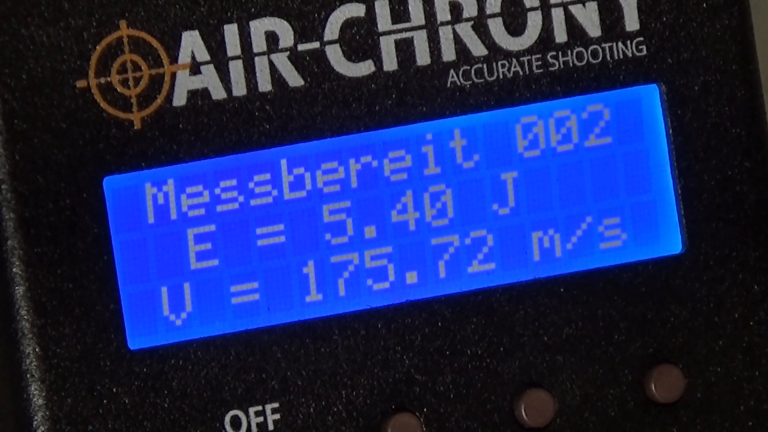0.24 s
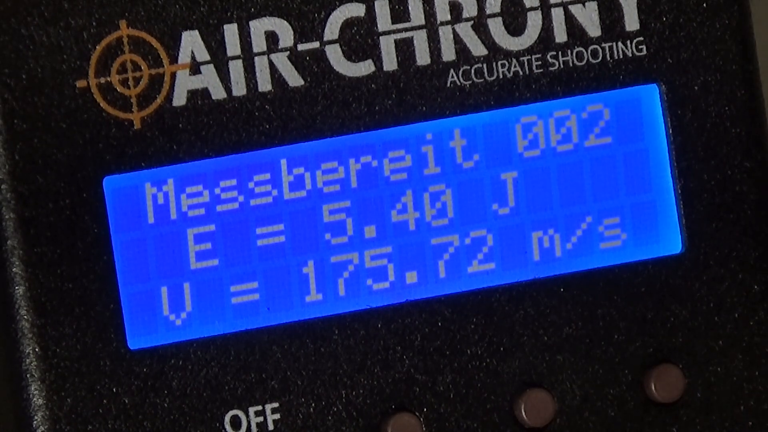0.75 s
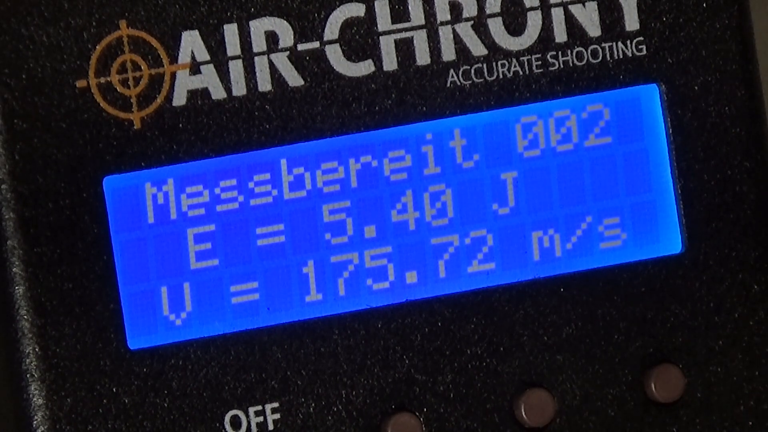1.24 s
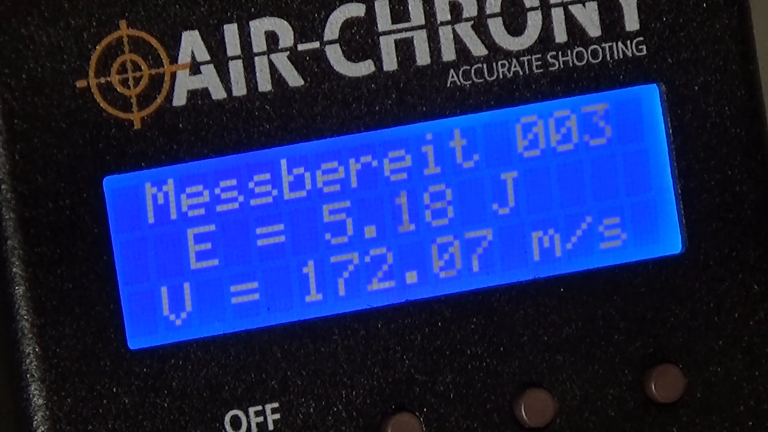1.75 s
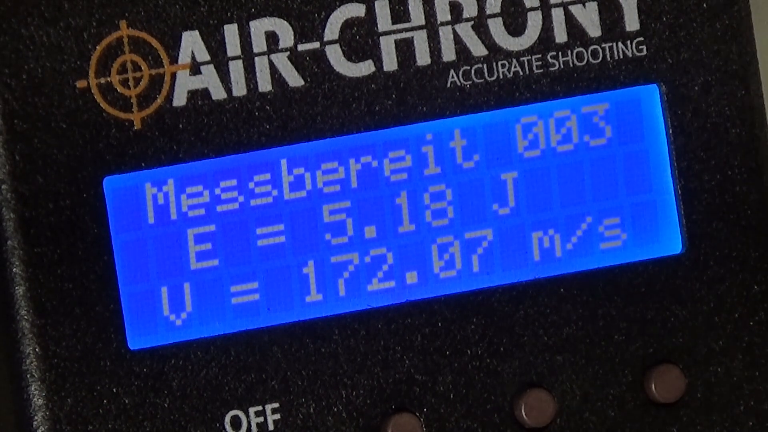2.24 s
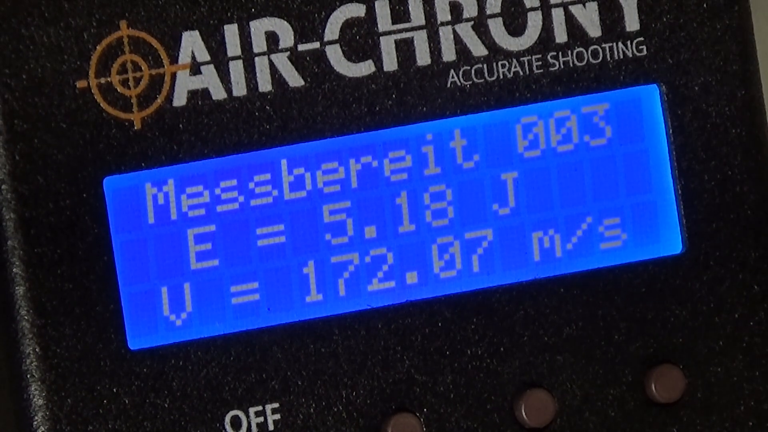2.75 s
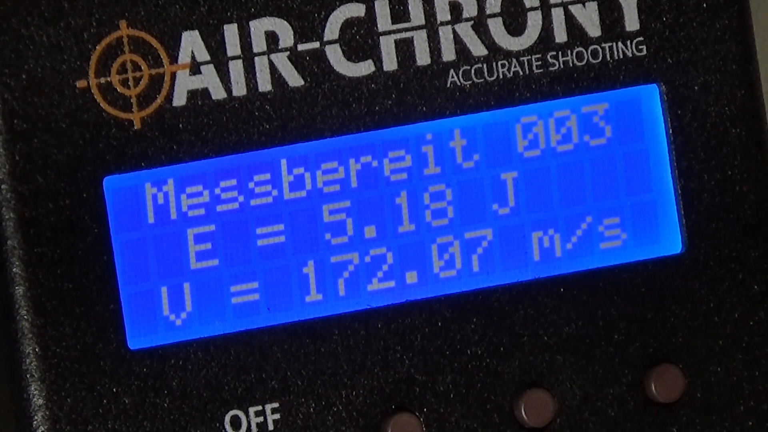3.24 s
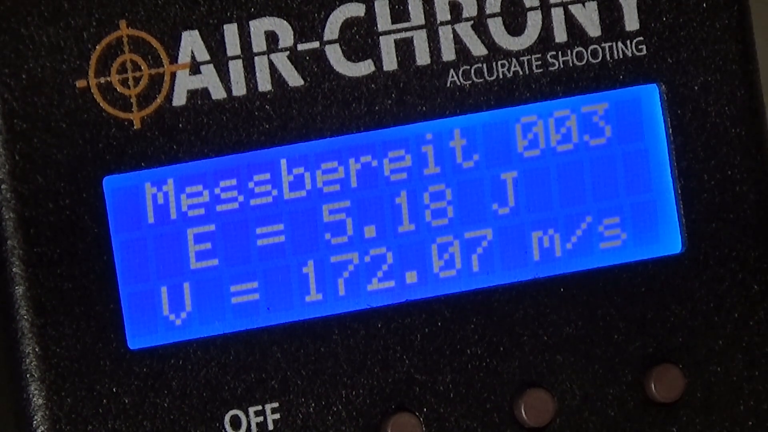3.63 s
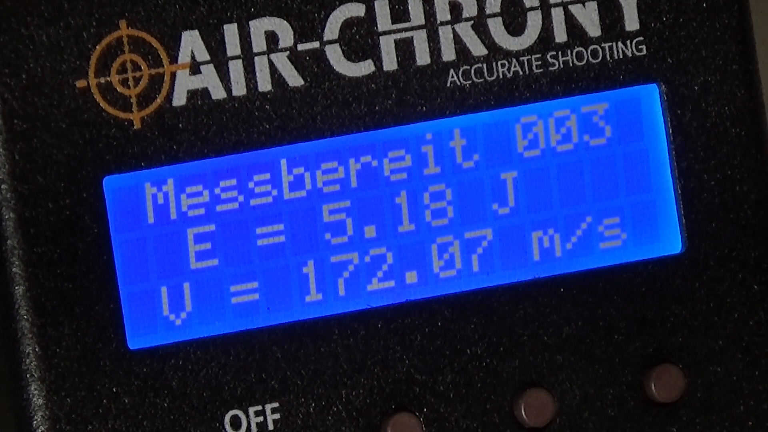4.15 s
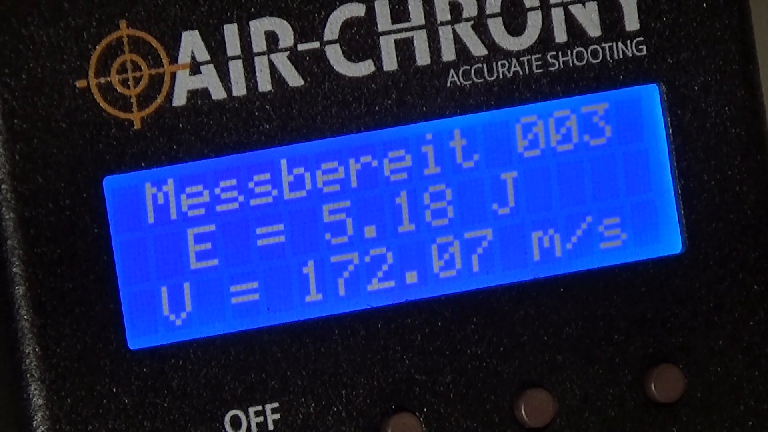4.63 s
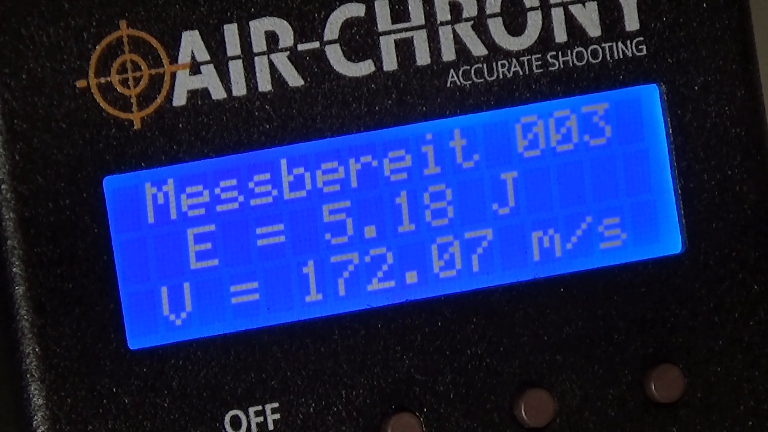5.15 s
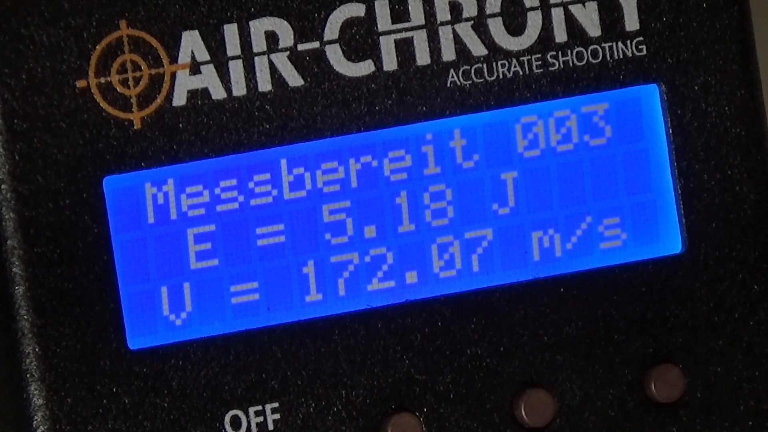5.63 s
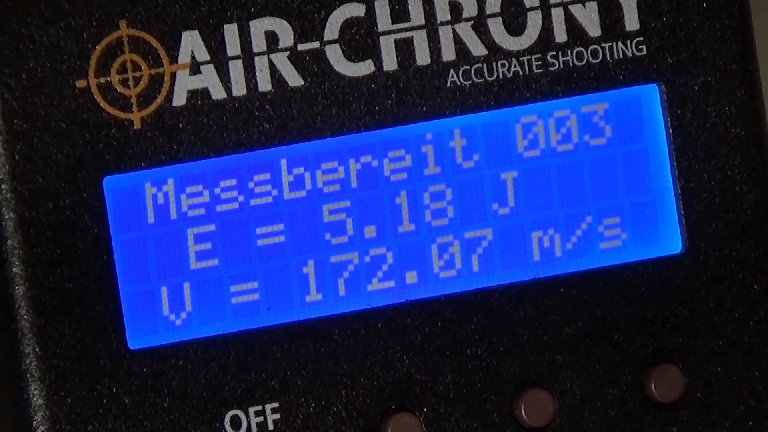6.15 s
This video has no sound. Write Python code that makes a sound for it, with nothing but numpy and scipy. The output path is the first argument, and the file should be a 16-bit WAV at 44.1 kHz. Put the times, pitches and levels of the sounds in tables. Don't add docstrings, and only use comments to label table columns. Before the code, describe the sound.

An empty shell rattles faintly, an air rifle fires one sharp crack, its steel lever clacks open and shut, a shell drops on hollow wood, cloth rustles.

```python
import sys
import numpy as np
from scipy import signal
from scipy.fft import rfft, irfft
from scipy.io import wavfile
from scipy.ndimage import uniform_filter1d

SR = 44100
rng = np.random.default_rng(int(sys.argv[2]) if len(sys.argv) > 2 else 0)


def invert_db(x):
    u = np.asarray(x, float) / 20
    return 10 ** u


def generate_wav(signal):
    frames = np.transpose(np.atleast_2d(signal))
    scaled = np.clip(frames, -1, 1) * 32767
    pcm = np.round(scaled).astype(np.int16)
    wavfile.write(sys.argv[1], SR, pcm)


N = 282240
SPAN = 2 ** 13

# time_s, level_db
HISS_LEVEL = [(1.4, -56.5), (3.5, -56), (4.82, -52.5), (5.17, -49.5), (6.4, -50)]
# frequency_hz, density_db
HISS_SPECTRUM = [(15, -64), (25, -24), (53, -15.5), (174, -4.5), (290, -1.5), (446, 1.5), (616, 1.5),
                 (785, 1.5), (2240, -3), (15600, -13.5)]
# frequency_hz, likeness (0 to 1)
HISS_LIKENESS = [(60, 0.49), (180, 0.92), (550, 0.11), (1650, 0.031), (4970, 0.77), (15000, 1)]

# frequency_hz, likeness (0 to 1)
ROOM_LIKENESS = [(60, 1), (150, 1.0), (380, 0.99), (950, 0.86), (2380, 0.7), (5980, 0.7), (15000, 1)]
# frequency_hz, t60_s
ROOM_DECAY = [(100, 0.73), (300, 0.58), (1000, 0.45), (3000, 0.51), (8000, 0.35), (16000, 0.17)]
# frequency_hz, level_db (against the blast), t60_s
ROOM_MODE = (214, -26, 1)
# start_s, level_db
EARLIER_BOOM = (0.3, -52)

# frequency_hz, density_db
CLOTH_SPECTRUM = [(2350, -22), (4000, -8.5), (6560, -10), (7480, -3.5), (10300, 0), (13700, 0), (15600, 1)]
# time_s, level_db
ARM_DRAG = [(4.3, -70), (4.75, -64), (4.86, -51), (5.05, -49), (5.45, -52), (5.9, -49.5), (6.4, -50.5)]
# peak_s, level_db, fine_db (finest fibres against the tug), rise_s, fall_s
SLEEVE_TUGS = [(1.79, -51, 0, 0.045, 0.06), (1.94, -55, 2, 0.042, 0.03), (4.5, -55, -4, 0.076, 0.088),
               (4.635, -54, 2, 0.015, 0.03), (4.78, -52, 1, 0.015, 0.05), (4.92, -62, -2, 0.08, 0.15),
               (5.17, -53, 3, 0.08, 0.36), (5.508, -48, -7, 0.05, 0.091), (5.81, -48, -6, 0.2, 0.021),
               (5.975, -47.5, 11, 0.015, 0.026), (6.168, -46, -6, 0.11, 0.08)]

# frequency_hz, density_db
BOARD_SPECTRUM = [(88, -69), (150, -35.5), (456, -13.5), (769, -1.5), (895, -10), (1590, -18.5),
                  (2220, -50.5), (4000, -77), (5200, -71), (8800, -120)]
BOARD_HZ = 753
# start_s, peak_db, pitch_hz
FLAT_BOUNCES = [(0.02, -16, 977), (0.039, -12.5, 968), (0.069, -18.5, 803), (0.099, -20.5, 1020),
                (0.309, -40, 780), (0.498, -38.5, 625), (0.558, -39, 670), (0.852, -34, 730),
                (2.888, -2.5, 726), (2.905, -12.5, 680), (2.956, -14.5, 750), (2.992, -5.5, 772),
                (3.072, -3.5, 803), (3.131, -8, 808)]
# start_s, peak_db, pitch_hz
RIM_BOUNCES = [(0.004, -15, 1245), (0.024, -15.5, 1335), (0.127, -21, 1002), (2.987, -15, 986),
               (3.018, -17, 990), (3.066, -14, 1090), (3.099, -19.5, 1035), (3.126, -24, 1123)]
# start_s, stop_s, level_db
SHELL_ROLL = (0.23, 0.73, -53.5)
# frequency_hz, density_db
EDGE_SPECTRUM = [(1000, -51), (2000, -12), (4000, 1), (7000, -7.5), (11000, -7.5), (16000, -14.5)]
# frequency_hz, density_db
SLAM_SPECTRUM = [(35, -78), (60, -44), (146, -25.5), (1080, 9), (1620, 5.5), (1840, 1), (2870, -5.5),
                 (3650, -34), (5000, -21), (6500, -62), (11000, -120)]
# start_s, peak_db, pitch_hz, bright_db (against the peak), t60_s
LEVER_SLAMS = [
    (2.699, 2, 1175, -36, 0.11),
    (2.711, -4.5, 1560, -10, 0.13),
    (2.724, -5.5, 1110, -18, 0.11),
    (2.736, -8.5, 835, -11.5, 0.16),
    (2.748, -4.5, 1290, -13.5, 0.054),
]
# frequency_hz, density_db
TAP_SPECTRUM = [(150, -43), (350, 3), (700, -4), (1200, -1), (2000, -7), (4000, -19)]
# start_s, peak_db, pitch_hz, bright_db (against the peak), t60_s
HAND_TAPS = [
    (5.15, -29, 2010, -24, 0.043),
    (5.529, -45, 820, -13, 0.062),
    (5.732, -36, 610, -21.5, 0.096),
    (5.986, -31, 4010, -14, 0.043),
]

# frequency_hz, density_db
STEEL_SPECTRUM = [(1060, -21.5), (1800, -8), (2320, -18.5), (2990, -6), (4170, -7), (6380, -12),
                  (9490, -6.5), (13000, -4.5), (15600, -16)]
# frequency_hz, density_db
STOCK_SPECTRUM = [(120, -59), (200, -19.5), (607, -1), (681, -6), (749, -5), (2500, -4.5), (3250, -49),
                  (5500, -120)]
# start_s, peak_db, high_ring_hz, t60_s
LATCH = (3330, -12.5, -6)
LATCH_HITS = [(1.954, -21.5, 10350, 0.032)]
CARRIER = (4270, -8.5, -10)
CARRIER_HITS = [
    (2.0313, -6.5, 14600, 0.11),
    (2.0448, -6, 14100, 0.024),
    (2.0891, -6, 10900, 0.048),
]
CAM = (4050, -4, -8)
CAM_HITS = [(2.1401, -5, 9570, 0.06)]
BOLT = (2380, -4.5, -32)
BOLT_HITS = [
    (2.1971, -11, 11760, 0.048),
    (2.203, 2, 12100, 0.035),
    (2.2091, 2.5, 13200, 0.074),
    (2.219, -3, 9600, 0.11),
    (2.2487, -6, 9700, 0.12),
]
RETURN = (2060, -0.23, -12.5)
RETURN_HITS = [(2.5845, -5, 10440, 0.063)]
HOOK = (2600, -18, -10)
HOOK_HITS = [(2.7203, -7.5, 10200, 0.044)]
LOCK = (2000, -15, -12)
LOCK_HITS = [
    (2.7583, -5, 10970, 0.045),
    (2.7749, 5.5, 11180, 0.035),
]
LINK = (1520, -4, -8.5)
LINK_SLIDES = [(2.0083, -11, 11600, 0.052), (2.1129, -7, 11460, 0.036), (2.1514, -21, 9500, 0.037),
               (2.6518, -1, 9580, 0.024)]
TAKE_UP = (1980, -0.5, -15)
TAKE_UP_SLIDES = [(2.5325, -32.5, 13200, 0.048), (2.5502, -23, 11700, 0.13), (2.5616, -9.5, 13500, 0.065)]
SPRING = (5350, 3, -18.5)
SPRING_SLIDES = [(2.602, 0, 9600, 0.025)]
GUIDE = (5900, -12, -33.5)
GUIDE_SLIDES = [(2.6148, -0.5, 9480, 0.076)]

# start_s, peak_db, length_s
TRIGGER = [(1.415, -23, 0.036)]
HAMMER = [(1.427, -11, 0.0064)]
BLAST = [(1.428, 0.0091, 0.071)]
# frequency_hz, density_db
BLAST_SPECTRUM = [(59, -54), (100, -24), (209, -14), (531, -13), (1000, -9), (2330, -7.5), (4580, -5.5),
                  (7770, -3.5), (12400, 3.5), (15600, -6.5)]
# frequency_hz, level_db, t60_s
BARREL_MODES = [(990, -19, .04), (1680, -18, .04), (4515, -18, .2), (4540, -16, .2), (8500, -15, .06),
                (9180, -13, .05), (12460, -11, .02), (12690, -4, .05)]


def at_hz(points, hz):
    table = np.array(points)
    return np.interp(np.log(hz), np.log(table[:, 0]), table[:, 1])


def in_time(rows):
    table = np.array(rows)
    return np.interp(np.arange(N) / SR, table[:, 0], table[:, 1])


def rms_one(x):
    return x / np.sqrt(np.mean(x ** 2) + 1e-20)


def cut(x, hz, kind):
    return signal.sosfilt(signal.butter(4, hz, kind, fs=SR, output="sos"), x)


def add(track, s, sound):
    i = round(s * SR)
    track[i:i + len(sound)] += sound[:N - i]


def coloured(spectrum, size, likeness=None):
    hz = np.maximum(np.arange(size // 2 + 1) * SR / size, 10)
    mid, side = rfft(rng.standard_normal((2, size))) * invert_db(at_hz(spectrum, hz))
    if likeness is None:
        return rms_one(irfft(mid, size))
    alike = np.clip(at_hz(likeness, hz), 0, 1)
    pair = np.sqrt(1 + alike) * mid + np.sqrt(1 - alike) * side * [[1], [-1]]
    return rms_one(irfft(pair, size))


def drift(rate_hz, size):
    r = np.exp(-2 * np.pi * rate_hz / SR)
    slow = signal.lfilter([1], [1, -2 * r, r * r], rng.standard_normal(size + 999))
    return rms_one(slow[999:])


def ring(x, hz, t60):
    r = invert_db(-60 / (t60 * SR))
    w = 2 * np.pi * hz / SR
    return signal.lfilter([0, np.sin(w)], [1, -2 * r * np.cos(w), r * r], x + 1e-18)


def burst(t60, rise_share, lumpy_db):
    t = np.arange(SPAN) / SR
    rise = (1 - np.exp(-t / (rise_share * t60))) ** 1.27
    return rise * invert_db(-60 * t / t60 + lumpy_db * drift(180, SPAN))


def hiss():
    return invert_db(in_time(HISS_LEVEL) + 2.5) * coloured(HISS_SPECTRUM, N, HISS_LIKENESS)


def room(x, stretch):
    noise = coloured([(20, 0), (20000, 0)], 2 ** 15, ROOM_LIKENESS)
    hz, t, cells = signal.stft(noise, SR, nperseg=256)
    t60 = stretch * at_hz(ROOM_DECAY, np.maximum(hz, 20))[:, None]
    tail = signal.istft(cells * invert_db(-60 * t / t60) / np.sqrt(t60), SR)[1]
    tail = tail * (1 - np.exp(-np.arange(tail.shape[1]) / (0.0011 * SR)))
    tail = tail / np.sqrt(np.sum(tail ** 2) / 2)
    return signal.fftconvolve(x[None], tail, axes=1)[:, :N]


def boom():
    hz, _, t60 = ROOM_MODE
    t = np.arange(SR) / SR
    wave = rms_one(ring(rng.standard_normal(SR), hz, 0.13))
    return wave * (1 - np.exp(-t / 0.014)) * invert_db(-60 * t / t60)


def standing_wave():
    out = np.zeros(N)
    add(out, BLAST[0][0], invert_db(ROOM_MODE[1]) * boom())
    add(out, EARLIER_BOOM[0], invert_db(EARLIER_BOOM[1]) * boom())
    return out


def sleeve():
    t = np.arange(N) / SR
    grain = invert_db(0.94 * drift(35, N) + 1.6 * drift(900, N))
    fade_in = np.clip((t - ARM_DRAG[0][0]) * 10, 0, 1)
    power = (fade_in * invert_db(in_time(ARM_DRAG))) ** 2
    fine_power = power * invert_db(2 * -5)
    for s, tug_db, fine_db, rise, fall in SLEEVE_TUGS:
        tug = (invert_db(tug_db) * np.interp(t, [s - rise, s, s + fall], [0, 1, 0])) ** 2
        power = power + tug
        fine_power = fine_power + tug * invert_db(2 * fine_db)
    fibres = coloured(CLOTH_SPECTRUM, N, HISS_LIKENESS) * grain
    coarse = rms_one(cut(fibres, 11500, "low"))
    fine = rms_one(cut(fibres, 11500, "high"))
    return invert_db(-1.06) * (np.sqrt(power) * coarse + np.sqrt(fine_power) * fine)


def wood(blows, spectrum, spectrum_hz, shift, ringing, note_db):
    out, click = np.zeros(N), np.eye(1, SPAN)[0]
    for s, peak_db, hz, bright_db, t60 in blows:
        shape = burst(t60, 0.02, 1.3)
        shifted = np.array(spectrum) * [(hz / spectrum_hz) ** shift, 1]
        body = coloured(shifted, SPAN) * shape
        lower = 0.43 * ring(click, 0.868 * hz, ringing * t60)
        note = invert_db(note_db) * (ring(click, hz, ringing * t60) + lower)
        edge = invert_db(bright_db + 3) * coloured(EDGE_SPECTRUM, SPAN) * shape
        add(out, s, invert_db(peak_db - 6.0) * (body + note + edge))
    return out


def bounces():
    flat_bright_db, rim_bright_db, t60 = -38.5, -21, 0.063
    flat = [(*row, flat_bright_db, t60) for row in FLAT_BOUNCES]
    rim = [(*row, rim_bright_db, t60) for row in RIM_BOUNCES]
    settle = []
    for k in range(4):
        hz = BOARD_HZ * rng.uniform(0.86, 1.03)
        settle.append((3.169 + k * 0.075, -21.5 - k * 6.5, hz, flat_bright_db, 0.083))
    return flat + rim + settle


def rolling():
    t = np.arange(N) / SR
    start, stop, roll_db = SHELL_ROLL
    level_db = np.interp(t, [stop, stop + 0.05], [roll_db, -61])
    heard = (t > start) * (t < stop + 0.25)
    return heard * invert_db(level_db - 6.5 + 2.0 * drift(60, N)) * coloured(BOARD_SPECTRUM, N)


def knocks():
    shell = wood(bounces(), BOARD_SPECTRUM, BOARD_HZ, shift=0.85, ringing=0.71, note_db=-0.5)
    board = cut(shell + rolling(), 195, "high")
    slams = wood(LEVER_SLAMS, SLAM_SPECTRUM, 1260, shift=0.14, ringing=0.31, note_db=-7.5)
    taps = wood(HAND_TAPS, TAP_SPECTRUM, 1000, shift=0.043, ringing=0.52, note_db=-0.5)
    jolt = np.zeros(N)
    add(jolt, LEVER_SLAMS[0][0], invert_db(-15) * ring(np.eye(1, SPAN)[0], 74, 0.015))
    return board + slams + jolt + taps


def steel(part, contacts, rise_share):
    out = np.zeros(N)
    low_hz, low_db, stock_db = part
    for s, peak_db, high_hz, t60 in contacts:
        shape = burst(t60, rise_share, 1.87)
        clatter = coloured(STEEL_SPECTRUM, SPAN) * shape
        push = rng.standard_normal(SPAN) * shape
        high = invert_db(-1.5) * ring(push, high_hz, 0.02) / 8
        low = invert_db(low_db) * ring(push, low_hz, 0.008) / 5
        stock = invert_db(stock_db + 2.5) * coloured(STOCK_SPECTRUM, SPAN) * shape
        add(out, s, invert_db(peak_db - 7.5) * (clatter + high + low + stock))
    return out


def lever():
    strokes = [(LATCH, LATCH_HITS), (CARRIER, CARRIER_HITS), (CAM, CAM_HITS), (BOLT, BOLT_HITS),
               (RETURN, RETURN_HITS), (HOOK, HOOK_HITS), (LOCK, LOCK_HITS)]
    slides = [(LINK, LINK_SLIDES), (TAKE_UP, TAKE_UP_SLIDES), (SPRING, SPRING_SLIDES),
              (GUIDE, GUIDE_SLIDES)]
    out = np.zeros(N)
    for part, hits in strokes:
        out += steel(part, hits[:1], rise_share=0.011)
        out += steel(part, hits[1:], rise_share=0.1)
    for part, contacts in slides:
        out += steel(part, contacts, rise_share=0.1)
    return cut(out, 420, "high")


def shot():
    out, walls, click = np.zeros(N), np.zeros(N), np.eye(1, SPAN)[0]
    tick_s, tick_db, tick_len = TRIGGER[0]
    add(out, tick_s, invert_db(tick_db) * coloured(STEEL_SPECTRUM, SPAN) * burst(tick_len, 0.33, 11.0))
    push_s, push_db, push_len = HAMMER[0]
    add(out, push_s, invert_db(push_db - 7.0) * ring(click, 1040, push_len))

    gas_s, gas_db, gas_len = BLAST[0]
    add(out, gas_s, invert_db(gas_db - 1) * ring(click, 293, 0.011))
    shape = burst(gas_len, 0.00037, 6.8)
    add(out, gas_s, invert_db(gas_db - 6.5) * coloured(BLAST_SPECTRUM, SPAN) * shape)
    kick = rng.standard_normal(SPAN) * shape / np.sqrt(gas_len * SR / 14)
    kick = np.pad(kick, (0, SR // 2))
    barrel = sum(invert_db(level_db + 10.5) * ring(kick, hz, t60) for hz, level_db, t60 in BARREL_MODES)
    add(walls, gas_s, barrel)
    add(out, gas_s, invert_db(-5) * barrel)
    pulse = irfft(invert_db(at_hz(BLAST_SPECTRUM, np.arange(1, 258) * SR / 512)))
    pulse = np.roll(pulse, 40) / np.sqrt(np.sum(pulse ** 2))
    add(walls, gas_s, invert_db(gas_db + 37.0) * pulse)
    return out, walls


def scene():
    gun, walls = shot()
    action, blows = lever(), knocks()
    direct = gun + action + blows + standing_wave()
    wet = room(walls, stretch=1.22) + room(invert_db(-2.0) * action + invert_db(-2.5) * blows, stretch=0.79)
    balance = invert_db(np.array([[-0.3], [0.3]]))
    return direct * balance + wet + sleeve()


def limiter(x):
    level_db = 10 * np.log10(uniform_filter1d(np.mean(x ** 2, axis=0), size=90) + 1e-12)
    ramp = 255 * np.arange(N) / SR
    cut_db = np.maximum.accumulate(np.maximum(level_db + 12, 0) + ramp) - ramp
    r = np.exp(-1 / (0.0032 * SR))
    cut_db = np.roll(signal.lfilter([1 - r], [1, -r], cut_db), -45)
    return 1.325 * np.tanh(x * invert_db(-cut_db) / 1.087)


def roll_off(x):
    return signal.sosfilt(signal.butter(12, 16850, fs=SR, output="sos"), x)


def record(dry):
    bass_cut = signal.butter(2, 277, "high", fs=SR, output="sos")
    held = signal.sosfilt(bass_cut, limiter(dry))
    top = signal.cheby2(12, 60, 16450, fs=SR, output="sos")
    mix = signal.sosfilt(top, held + hiss())
    return roll_off(mix)


dry = scene()
out = record(dry)
generate_wav(out)
```